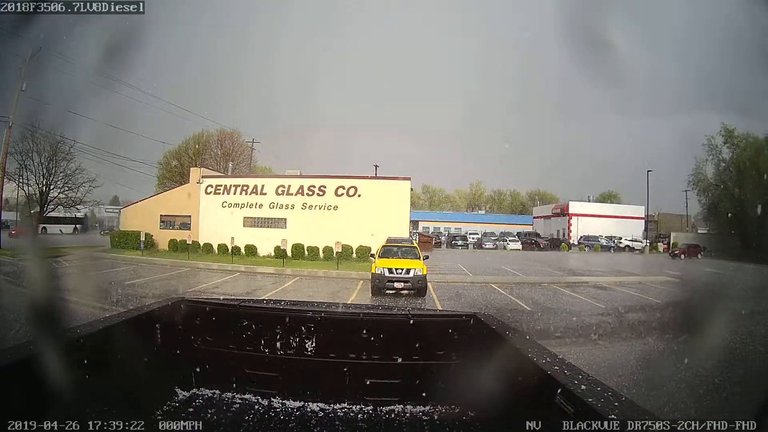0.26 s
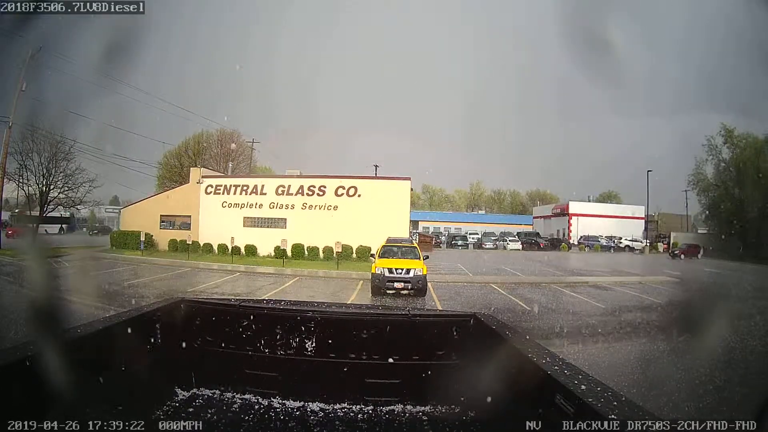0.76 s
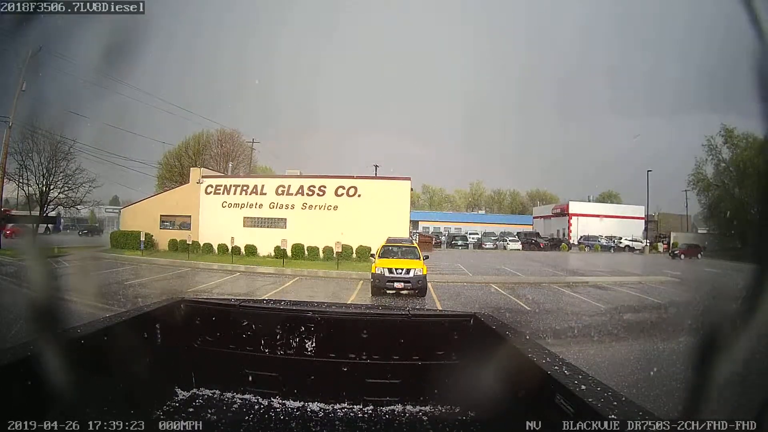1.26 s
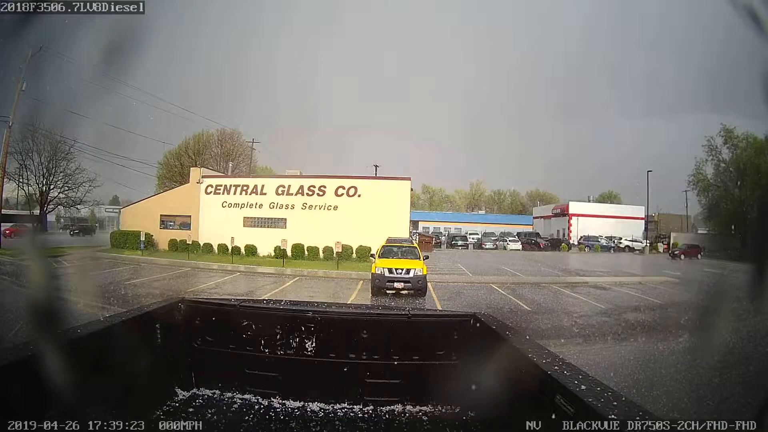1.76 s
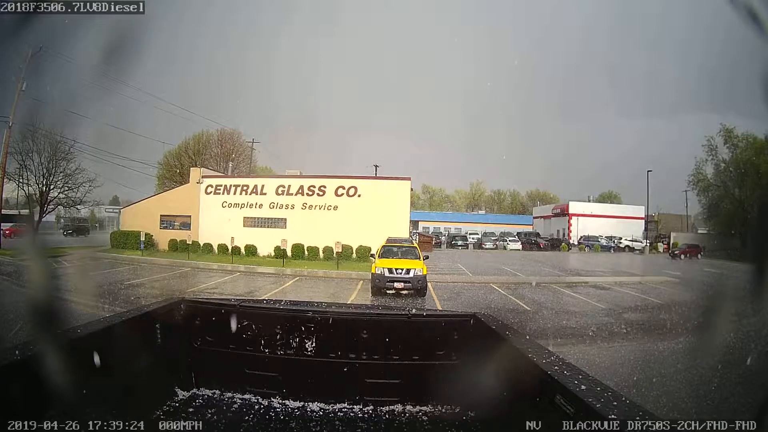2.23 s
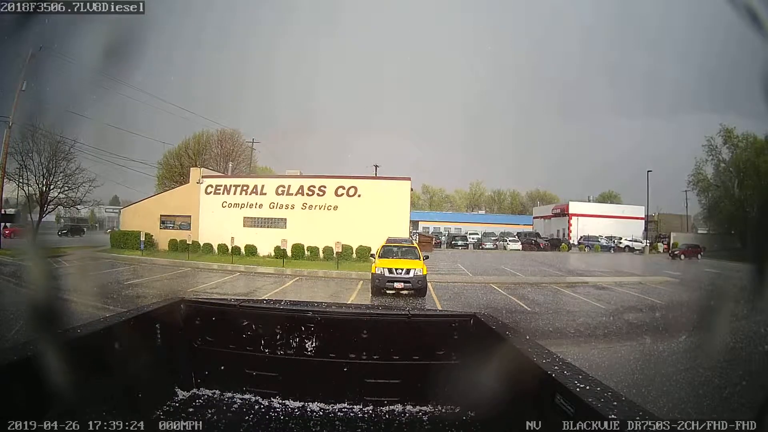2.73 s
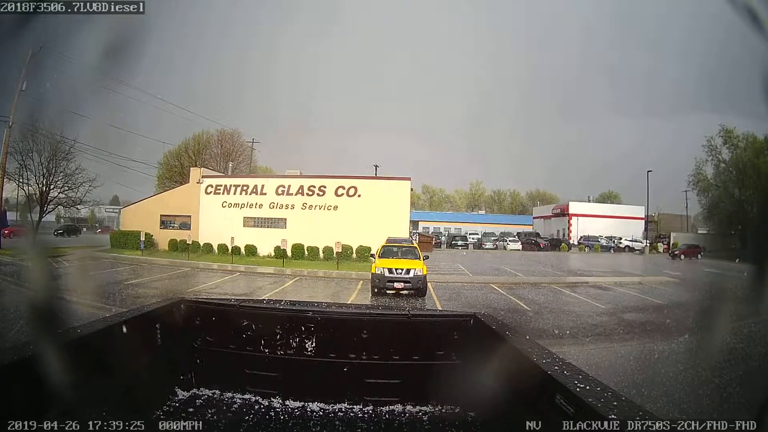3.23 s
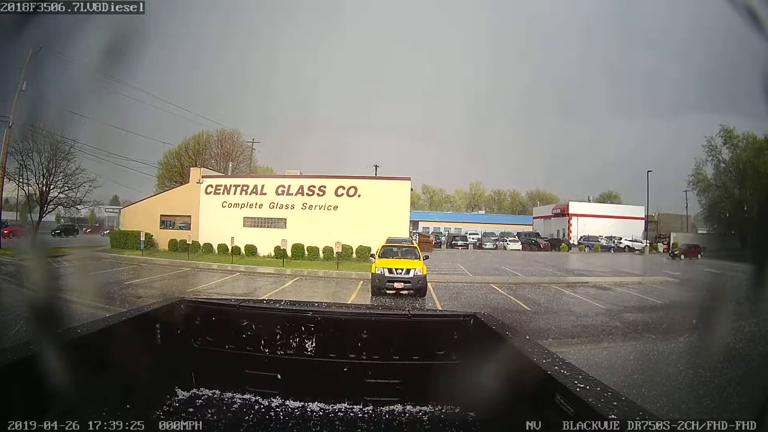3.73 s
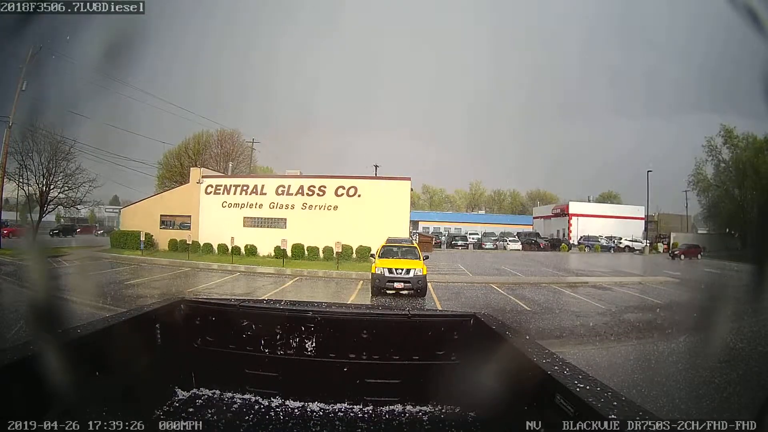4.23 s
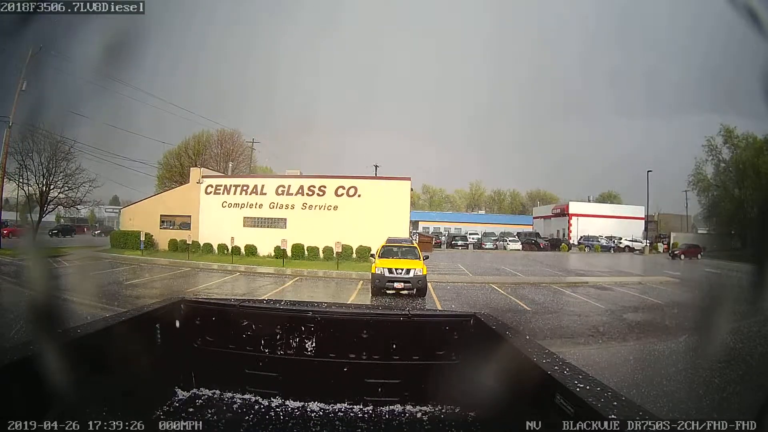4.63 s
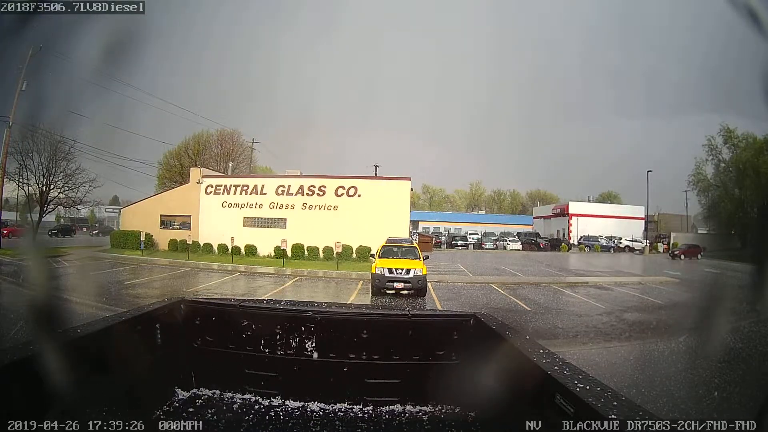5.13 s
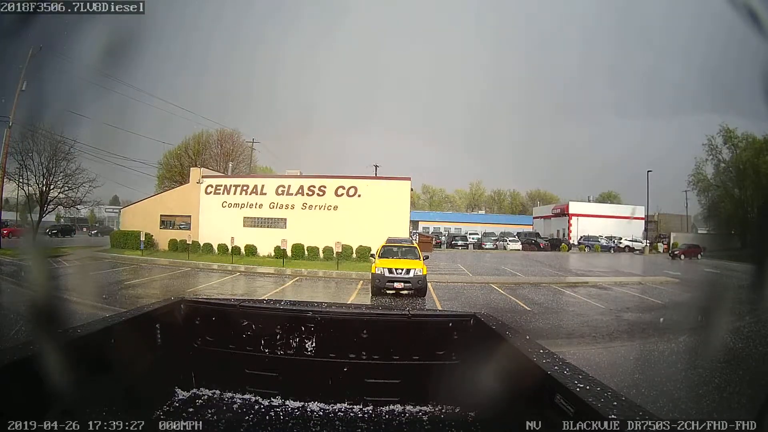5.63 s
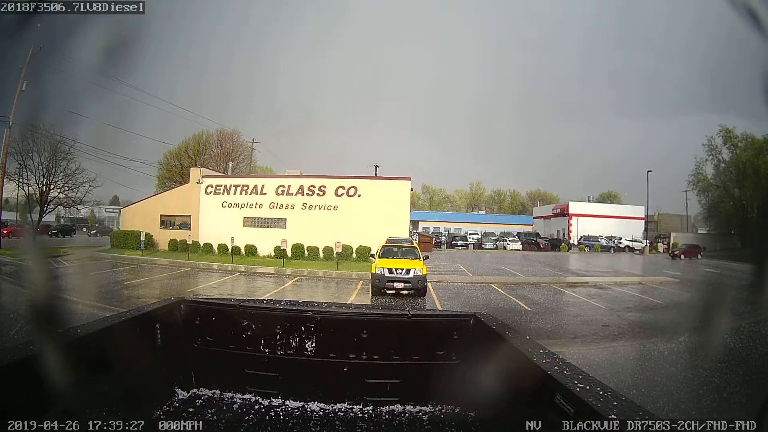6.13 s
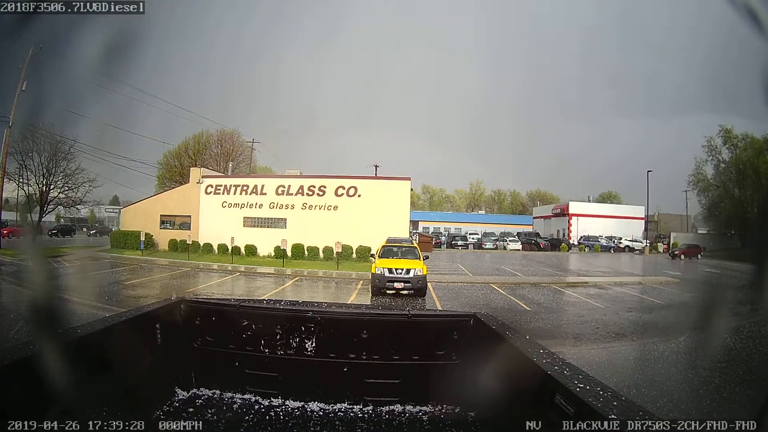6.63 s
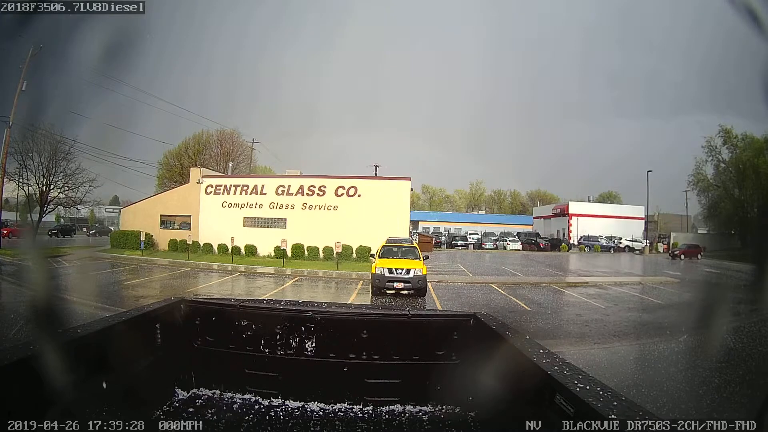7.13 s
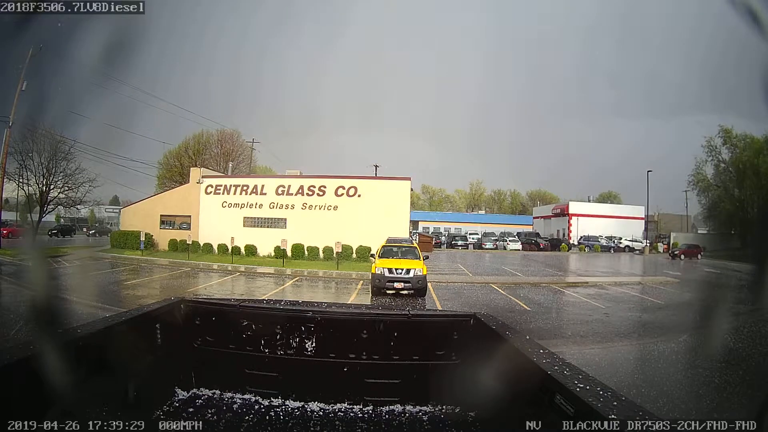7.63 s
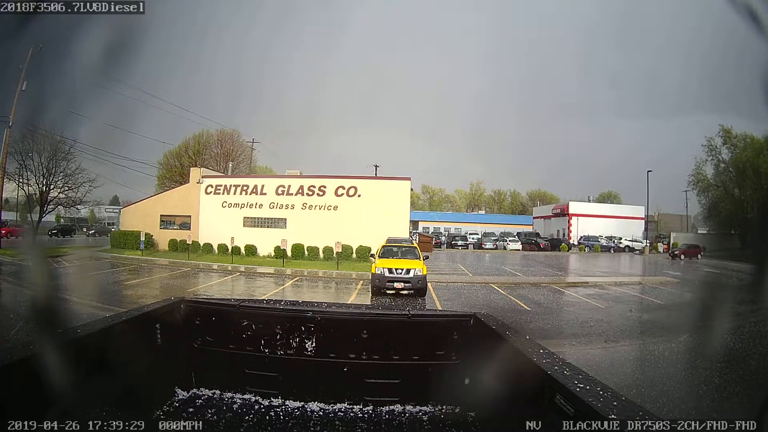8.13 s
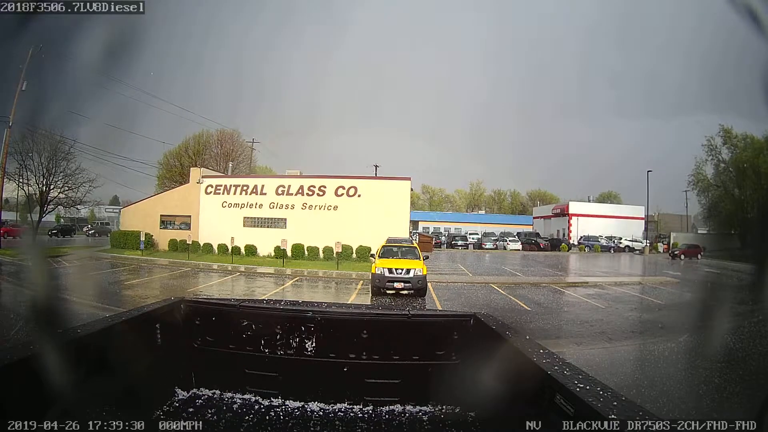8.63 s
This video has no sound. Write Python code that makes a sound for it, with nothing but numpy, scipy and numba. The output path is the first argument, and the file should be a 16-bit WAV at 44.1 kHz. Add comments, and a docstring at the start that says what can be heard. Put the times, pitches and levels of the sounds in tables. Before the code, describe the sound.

Hail hammers a parked pickup, heard from inside the closed cab, a dense clipping clatter that thins to scattered hard knocks over faint rain.

```python
"""Hail on a parked pickup

Hail pelts roof, glass and bed, heard from inside the closed cab; it thins out, and the loudest stones overload.
Each stone rings many damped modes of panels and cab; small stones patter at random between them.
Shaped noise makes the rain and rolling rumble, a sine the idling hum, and narrow resonances a late drone.
A bright scratchy rattle of filtered clicks and a few soft thumps, swelling and dying sines, break through."""
import sys
import numpy as np
from numba import njit
from scipy import signal
from scipy.fft import rfft, irfft, next_fast_len
from scipy.io import wavfile
from scipy.ndimage import uniform_filter1d

SR = 44100
rng = np.random.default_rng(int(sys.argv[2]) if len(sys.argv) > 2 else 0)


def voltage_ratio(level):
    """Linear amplitude factor for a level in decibels (scalar or array-like)."""
    return 10 ** (np.asarray(level, float) / 20)


def wav_record(signal):
    """Record a signal, one row per channel, as 16-bit PCM in the file named by sys.argv[1]."""
    frames = np.transpose(np.atleast_2d(signal))
    bounded = np.clip(frames, -1, 1)
    # unit amplitude maps onto the largest positive 16-bit level
    quanta = np.round(bounded * 32767).astype(np.int16)
    wavfile.write(sys.argv[1], SR, quanta)


N = 391602

# Big stones; clack comes from hard or stiff spots, thud from wide soft panels, both relative to the stone:
# start_s, level_db, clack_db, thud_db
BIG_STONES = [(0.002, -0.5, -14, -18.5), (0.083, -2, -18, -16), (0.127, -1.5, -16.5, -15.5),
              (0.146, -3, -12, -16), (0.213, -3.5, -18, -11.5), (0.265, 0.5, -13.5, -11.5),
              (0.319, -2, -20.5, -21), (0.403, -2, -19.5, -22), (0.415, 2, -16.5, -20.5),
              (0.446, 0, -18, -10), (0.479, -3, -16, -13.5), (0.562, 1.5, -16.5, -13),
              (0.611, 1, -15.5, -16), (0.656, -3, -15, -19), (0.707, -3.5, -19.5, -20),
              (0.741, -2.5, -16.5, -20), (0.793, -1, -11, -16.5), (0.832, -1, -19, -11),
              (0.884, -4, -13, -11), (0.933, 0, -11.5, -14), (0.955, 1, -19.5, -19.5),
              (1.017, -5.5, -12, -13), (1.043, -4.5, -17.5, -16), (1.119, -5.5, -20.5, -12.5),
              (1.167, -4.5, -11, -10.5), (1.199, -2, -18, -17.5), (1.254, -12, -20, -11),
              (1.289, -5.5, -26.5, -14), (1.356, -1.5, -16.5, -12), (1.398, -6, -12.5, -11),
              (1.432, -2.5, -13, -13.5), (1.499, 2, -20, -22), (1.571, -2.5, -15, -13.5),
              (1.655, -4.5, -7.5, -17), (1.706, -3, -11.5, -13), (1.762, -0.5, -19.5, -18),
              (1.81, 1, -17, -13), (1.856, -5.5, -7, -10.5), (1.904, 0.5, -14.5, -13),
              (1.948, 0.5, -15.5, -21), (1.997, -4.5, -17.5, -16), (2.055, -9.5, -10, -15),
              (2.072, -0.5, -15.5, -31), (2.114, -4.5, -17, -18), (2.134, -3, -11, -14.5),
              (2.236, 3.5, -13.5, -19.5), (2.279, -2.5, -26, -11), (2.342, -3.5, -16.5, -12),
              (2.368, -5, -14.5, -18), (2.471, -9, -25, -11), (2.488, -4.5, -16.5, -18),
              (2.504, -2, -18, -13.5), (2.561, -3.5, -16.5, -13), (2.609, -1.5, -18, -15),
              (2.639, -3.5, -16.5, -12), (2.691, 1.5, -19.5, -16.5), (2.732, 1.5, -13.5, -17.5),
              (2.814, -3.5, -22, -11.5), (2.896, -2, -17.5, -13.5), (2.93, -3, -18, -22),
              (2.99, -3, -10, -11.5), (3.028, -5, -29, -13), (3.07, 0, -19.5, -19.5),
              (3.109, -1.5, -19, -15.5), (3.223, -1.5, -15, -9), (3.267, -7, -17.5, -17),
              (3.347, -7.5, -12, -18), (3.389, 1.5, -13.5, -13.5), (3.446, -5.5, -10, -15),
              (3.493, -0.5, -12, -13), (3.594, -5, -16, -17), (3.642, -5, -12.5, -17.5),
              (3.672, -4, -13.5, -13), (3.746, -2.5, -17, -9), (3.766, -5.5, -9.5, -17),
              (3.787, -8.5, -10.5, -23), (3.836, -14, -12, -24), (3.915, -1, -15, -28.5),
              (3.972, -2, -17, -16.5), (4.071, -10.5, -10.5, -14), (4.109, -1, -16, -15),
              (4.137, -6.5, -12.5, -12), (4.161, -4.5, -21, -18), (4.231, -6.5, -14.5, -15),
              (4.247, -6, -9.5, -12), (4.287, -4, -25.5, -26), (4.324, -8.5, -23, -7),
              (4.354, -7, -18.5, -14), (4.398, -3, -13.5, -15), (4.463, -2, -20.5, -16.5),
              (4.543, -2, -17.5, -14), (4.576, -7.5, -11.5, -15), (4.608, 1.5, -7.5, -27.5),
              (4.653, -11, -19, -15.5), (4.73, -18.5, -10, -15), (4.768, -1.5, -21, -24),
              (4.8, 2.5, -19, -19.5), (4.901, -11.5, -16, -14), (4.917, -6, -15, -14.5),
              (4.934, -4.5, -17.5, -27), (4.987, -3.5, -14.5, -13.5), (5.075, 1, -15.5, -19),
              (5.12, -5, -15.5, -11), (5.157, -5.5, -15, -18), (5.184, 2, -19.5, -13.5),
              (5.259, -10, -7.5, -28.5), (5.304, -4, -16, -20), (5.396, -12.5, -9, -19),
              (5.417, -6.5, -11.5, -12.5), (5.432, 0.5, -16.5, -27), (5.479, -4, -13, -15.5),
              (5.507, -1.5, -13.5, -20), (5.535, -12.5, -9, -7), (5.573, -16.5, -9.5, -11),
              (5.621, -4, -21.5, -15.5), (5.666, -11, -9, -17), (5.773, -8.5, -15, -28),
              (5.833, -12, -11, -29), (5.859, -32.5, -12, -9), (5.953, 3, -25, -16.5),
              (6.036, -8, -10.5, -12), (6.087, -22.5, -8.5, -24), (6.236, -12, -14, -6),
              (6.324, -14.5, -15, -16), (6.333, -11.5, -10.5, -13.5), (6.402, -18.5, -11.5, -23),
              (6.459, -9, -18.5, -7.5), (6.475, -5.5, -15, -12), (6.525, -6.5, -12.5, -16),
              (6.737, -9.5, -16, -27.5), (6.781, -4, -20, -19), (6.99, 3, -15, -20),
              (7.266, 2.5, -13.5, -23), (7.309, -14.5, -23.5, -4), (7.361, -15, -9.5, -10.5),
              (7.471, -17.5, -6, -15), (7.535, 3.5, -15.5, -19), (7.635, -20.5, -35, 3.5),
              (7.721, 3.5, -13, -19), (7.778, -20.5, -18, -16), (7.839, -29.5, -9.5, -12),
              (7.905, -20, -8, -22), (7.995, -1.5, -8, -26), (8.171, -3.5, -22, -24),
              (8.202, -9.5, -16, -10.5), (8.456, -21, -11, -21), (8.48, -4, -23, -19),
              (8.614, -12, -20.5, -13), (8.642, -3.5, -11.5, -31)]
# Dull low thumps: start_s, level_db, pitch_hz
LOW_THUMPS = [(1.167, -12.5, 105.4), (1.946, -12.5, 147), (2.27, -12.5, 141), (3.648, -8.5, 122),
              (5.077, -15.5, 180), (6.97, -9, 125), (7.683, -15, 132)]
# Course of the storm, before scatter and drift: time_s, patter_db, rumble_db
STORM_COURSE = [(0, -8, -23.5), (2.001, -8.5, -33), (3.598, -17, -26.5), (4.7, -21.5, -29),
                (5.5, -31, -40.5), (6.299, -46.5, -43), (7.1, -43, -32.5), (8.2, -50.5, -34.5),
                (8.88, -65, -46.5)]
# Relative colour of panels and cab, before each stone sets its band levels: frequency_hz, density_db_per_hz
CAB_COLOUR = [(88, -31), (150, -9), (247, -11.5), (741, 1), (875, -3.5), (1330, 2), (1730, -17),
              (2260, -8.5), (3780, -22), (5460, -19.5), (7240, -32.5), (8000, -90.5), (10400, -77),
              (17600, -120)]
# Typical ring of the panels, before scatter from mode to mode: frequency_hz, t60_s
PANEL_RING = [(200, 0.26), (530, 0.13), (1390, 0.11), (3680, 0.055)]
# Relative colour of the rolling rumble: frequency_hz, density_db_per_hz
RUMBLE_COLOUR = [(18, -22.5), (30, -6), (49, -21), (81, -2.5), (130, 6.5), (300, -12), (390, -38),
                 (660, -120)]
# Swell and fade of the late drone: time_s, level_db
DRONE_SWELL = [(0, -57.5), (8.1, -47), (8.24, -27), (8.5, -50.5), (8.88, -45)]
# Resonances of the drone: frequency_hz, width_hz, relative_level_db
DRONE_RESONANCES = [(60, 12, 1), (119, 9.4, -2), (178.4, 19, -2.5)]
# Limits of the thud, knock, clack and tick bands: frequency_hz
STONE_BAND_EDGES_HZ = [180, 550, 1750, 3600, 7500]
# Relative colour of rain heard through the shell: frequency_hz, density_db_per_hz
RAIN_COLOUR = [(150, -4), (560, -5), (1290, -8), (1760, -25), (2230, -17), (3760, -30.5), (7100, -37.5),
               (8500, -65)]
# One bright scratchy rattle: start_s, end_s, level_db
RATTLE_BURST = (4.07, 4.175, -33)


def rms_one(x):
    """Scale to rms 1."""
    return x / np.sqrt(np.mean(x ** 2) + 1e-20)


def at_hz(points, hz):
    """Read a table on a log-frequency axis."""
    table_hz, value = np.transpose(points)
    return np.interp(np.log(hz), np.log(table_hz), value)


def drift(rate_hz):
    """Slow random wander of spread 1: noise through two equal low-pass poles, at a fortieth of the rate."""
    hop = 40
    pole = np.exp(-2 * np.pi * rate_hz * hop / SR)
    noise = rng.standard_normal(N // hop + 2002)
    slow = signal.lfilter([1], [1, -2 * pole, pole * pole], noise)[2000:]   # settled part only
    return np.interp(np.arange(N) / hop, np.arange(len(slow)), rms_one(slow))


def coloured(spectrum):
    """Noise with the given spectrum, rms 1."""
    size = next_fast_len(N)
    hz = np.arange(size // 2 + 1) * SR / size + 1e-3
    bins = rfft(rng.standard_normal(size)) * voltage_ratio(at_hz(spectrum, hz))
    return rms_one(irfft(bins, size)[:N])


def rumble(rumble_db):
    """Rolling low noise whose level follows the storm with a slow wander."""
    return voltage_ratio(rumble_db + 3.2 * drift(5.1)) * coloured(RUMBLE_COLOUR)


def idle():
    """Idling hum: one steady low sine, wavering slightly in level."""
    pitch_hz, level_db = 40.3, -43.5
    phase = 2 * np.pi * pitch_hz * np.arange(N) / SR
    return voltage_ratio(level_db + 1.1 * drift(6.0)) * np.sqrt(2) * np.sin(phase)


def rain(patter_db):
    """Rain wash through the shell: coloured noise, louder while the hail is thick."""
    floor_db = -48
    downpour_db = 0.32 * (patter_db - patter_db.min())
    return voltage_ratio(floor_db + downpour_db + 3.9 * drift(20.0)) * coloured(RAIN_COLOUR)


def drone():
    """A low hum swells near the end and fades: noise twice through narrow resonances."""
    s, db = np.transpose(DRONE_SWELL)
    hum = 0
    for hz, width_hz, line_db in DRONE_RESONANCES:
        r = np.exp(-np.pi * width_hz / SR)
        peak = [1, 0, -1, 1, -2 * r * np.cos(2 * np.pi * hz / SR), r * r]
        line = signal.sosfilt([peak, peak], rng.standard_normal(N))
        hum = hum + voltage_ratio(line_db) * rms_one(line)
    return voltage_ratio(np.interp(np.arange(N) / SR, s, db)) * hum


def rattle():
    """Dense uneven clicks through a broad bright resonance."""
    start, end, db = RATTLE_BURST
    t = np.arange(N) / SR
    clicks_per_s = 1200
    clicks = rng.standard_normal(N) * (rng.random(N) < clicks_per_s / SR)
    clicks = clicks * (t > start) * (t < end)
    resonance = signal.butter(2, [3600, 4700], "band", fs=SR, output="sos")
    ringing = signal.sosfilt(resonance, clicks + 1e-18)
    burst_share = (end - start) * SR / N   # sets the level over the burst, not the whole scene
    return voltage_ratio(db) * rms_one(ringing) * np.sqrt(burst_share)


def thumps():
    """Soft heavy blows on a large panel: a few cycles that swell and die."""
    out, t = np.zeros(N), np.arange(SR // 5) / SR
    rise = t / 0.0073   # the swell tops out after 7.3 ms
    swell = rise * np.exp(1 - rise)
    for s, db, hz in LOW_THUMPS:
        i = int(s * SR)
        thump = voltage_ratio(db) * swell * np.sin(2 * np.pi * hz * t)
        out[i:i + len(t)] += thump[:N - i]
    return out


@njit(fastmath=True)
def add_resonators(out, at, length, a, b, now):
    """Run bundles of eight two-pole resonators that start together and add their sum."""
    before = np.zeros(now.shape)
    for k in range(len(at)):
        for i in range(at[k], min(at[k] + length[k], len(out))):
            total = 0.
            for m in range(8):
                value = now[k, m]
                total += value
                now[k, m] = a[k, m] * value - b[k, m] * before[k, m]
                before[k, m] = value
            out[i] += total


def damped_sines(at, size, hz, t60):
    """Sum of dying sines, each bundle followed until its longest mode is 40 dB down."""
    r, w, out = voltage_ratio(-60 / (t60 * SR)), 2 * np.pi * hz / SR, np.zeros(N)
    length = (2 / 3 * t60.max(axis=1) * SR).astype(int)
    add_resonators(out, at, length, 2 * r * np.cos(w), r * r, size * np.sin(w))
    return out


def stone_bands(level_db, clack_db, thud_db):
    """Thud, knock, clack and tick of a stone: the harder it clacks, the more it ticks and the less it knocks."""
    usual_clack_db = -15
    hard_db = clack_db - usual_clack_db
    spot_db = 4.5 * (2 * rng.random(len(level_db)) - 1)   # chance of the spot that is hit
    knock_db = -8 - 0.22 * hard_db
    tick_db = clack_db - 12.5 + 0.89 * hard_db + spot_db
    return level_db[:, None] + np.transpose([thud_db, knock_db, clack_db, tick_db])


def panels(s, band_db, ring_db, count):
    """Each stone lands on another patch of panel and rings a dense set of modes of its own."""
    edges = 150 + 7850 * np.linspace(0, 1, count + 1) ** 1.9   # Hz, closer together in the lows
    place, lag, spot, loss = np.moveaxis(rng.random((len(s), 4, count)), 1, 0)
    hz = edges[:-1] + np.diff(edges) * place
    ring_scatter_db = 1.5 * (2 * loss - 1) + ring_db[:, None]   # per mode, and per patch
    t60 = np.clip(at_hz(PANEL_RING, hz) * voltage_ratio(ring_scatter_db), .01, .5)

    # a mode stands for the band around it; modes beyond the outer limits join the nearest band
    power = voltage_ratio(2 * at_hz(CAB_COLOUR, hz)) * np.diff(edges)
    band = np.clip(np.searchsorted(STONE_BAND_EDGES_HZ, edges[1:]) - 1, 0, 3)
    against_cab_db = band_db - 10 * np.log10(np.bincount(band, power.mean(axis=0)))
    # neighbouring bands blend
    gain_db = uniform_filter1d(against_cab_db[:, band], size=count // 16, mode="nearest")
    size = np.sqrt(power) * voltage_ratio(gain_db) * 2 * (2 * spot - 1)

    late_s = (.0008 + 2.5 / hz) * lag   # many paths; the lows build up later
    start = ((s[:, None] + late_s) * SR).astype(int)
    at = np.tile(start[:, ::8].ravel(), 2)   # eight modes share a start
    size, hz, t60 = size.reshape(-1, 8), hz.reshape(-1, 8), t60.reshape(-1, 8)

    # every mode sounds twice: a long ring and a first crack that dies in a few ms
    size = np.vstack([size, size[:, ::-1]])
    hz, t60 = np.vstack([hz, hz]), np.vstack([t60, np.full_like(hz, 0.0083)])
    low = hz[:, -1] < STONE_BAND_EDGES_HZ[2]
    lows, highs = [damped_sines(at[use], size[use], hz[use], t60[use]) for use in (low, ~low)]
    soften = signal.butter(4, 2300, fs=SR, output="sos")   # low modes start without a click
    return highs + signal.sosfilt(soften, lows + 1e-18)


def big_stones(table):
    """Strikes from the table, each ringing its own patch of panel."""
    return panels(table[:, 0], table[:, 1:], np.zeros(len(table)), count=112)


def followers(table, patter_db):
    """Two softer stones close behind each big one, weaker as the hail thins and the later they land."""
    after = np.repeat(table, 2, axis=0)
    draw = rng.random((len(after), 6))
    s = after[:, 0] + 0.0046 - .016 * np.log(draw[:, 0] + .05)
    thin_db = 0.4 * (patter_db[(after[:, 0] * SR).astype(int)] - patter_db.max())
    late_db = -121 * (s - after[:, 0])   # dB, at 121 dB per second of delay
    softer_db = -4.0 - 4.2 * draw[:, 1]
    band_scatter_db = 3.7 * (draw[:, 2:] - .5)
    band_db = after[:, 1:] + (thin_db + late_db + softer_db)[:, None] + band_scatter_db
    return panels(s, band_db, np.zeros(len(s)), count=32)


def small_stones(patter_db):
    """Patter of 1100 small stones at random times: many faint, few strong, each hard or wet."""
    draw = rng.random((1100, 4))
    s = draw[:, 0] * N / SR
    size_db = patter_db[(s * SR).astype(int)] - 14.0 - 3.8 * np.log(draw[:, 1] + 0.038)
    hard_db = 8.9 * (draw[:, 2] - .5)   # hard stones are bright, wet ones dull
    # thud, knock, clack, tick
    tone_db = [-14.0, -2.5, -13.0, -26.5] + hard_db[:, None] * [-1.8, -0.44, 1.2, 0.89]
    ring_db = 4.0 * (2 * draw[:, 3] - 1)   # some patches ring longer
    return panels(s, size_db[:, None] + tone_db, ring_db, count=32)


def hail(patter_db):
    """Big stones, others close behind them, and small stones at random, all ringing the panels."""
    s, *levels_db = np.transpose(BIG_STONES)
    table = np.column_stack([s, stone_bands(*levels_db)])
    return big_stones(table) + followers(table, patter_db) + small_stones(patter_db)


def scene():
    """Rumble, idling hum, rain, drone, rattle and thumps under the hail."""
    s, *columns = np.transpose(STORM_COURSE)
    patter_db, rumble_db = [np.interp(np.arange(N) / SR, s, c) for c in columns]
    background = rumble(rumble_db) + idle() + rain(patter_db) + drone()
    return (background + rattle() + thumps() + hail(patter_db))[None]


def top_cut(x):
    """Nothing passes above the cut-off."""
    return signal.sosfilt(signal.butter(12, 8750, fs=SR, output="sos"), x)


def record(dry):
    """Narrow-band recorder: deep bass and top are cut steeply, loud peaks are clipped flat."""
    x = signal.sosfilt(signal.butter(6, 35, "high", fs=SR, output="sos"), dry)
    x = signal.sosfilt(signal.butter(14, 7530, fs=SR, output="sos"), x)
    mix = np.clip(x, -1, 1)
    return top_cut(mix)


dry = scene()
out = record(dry)
wav_record(out)
```